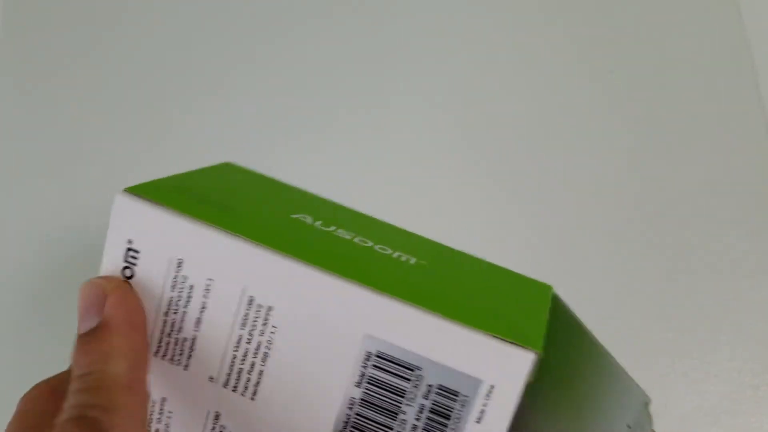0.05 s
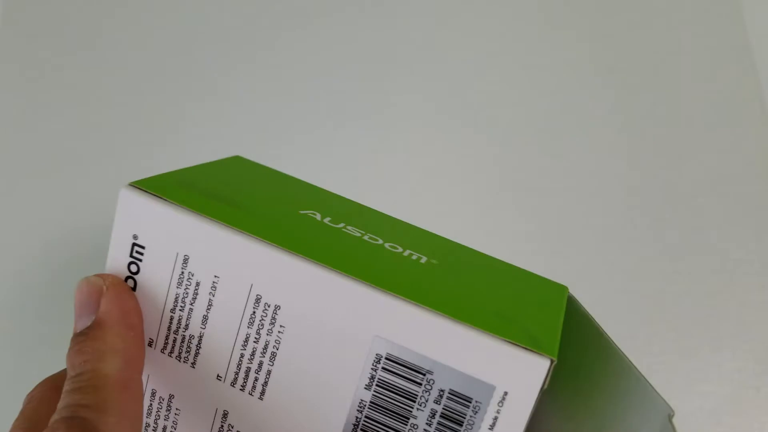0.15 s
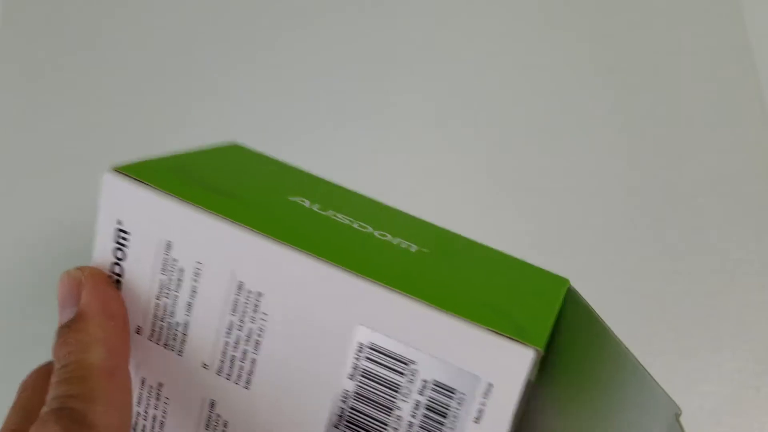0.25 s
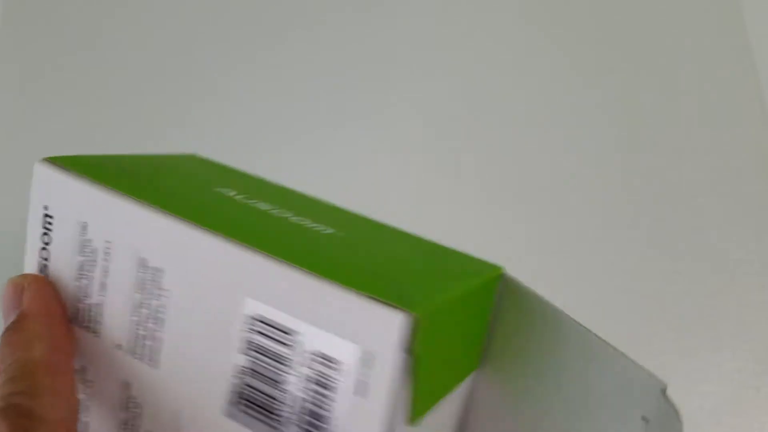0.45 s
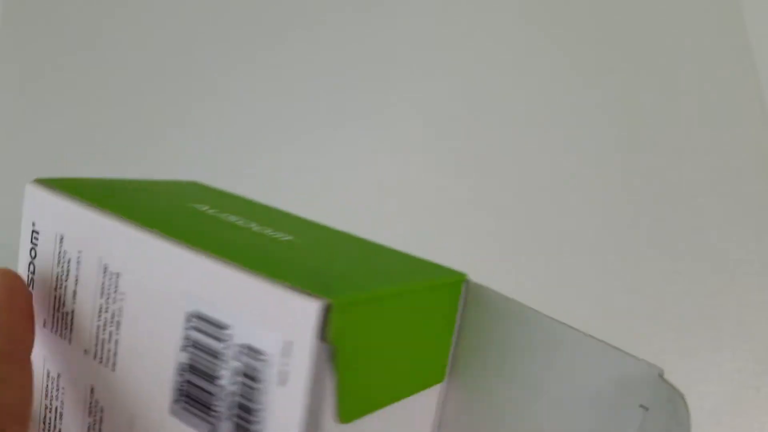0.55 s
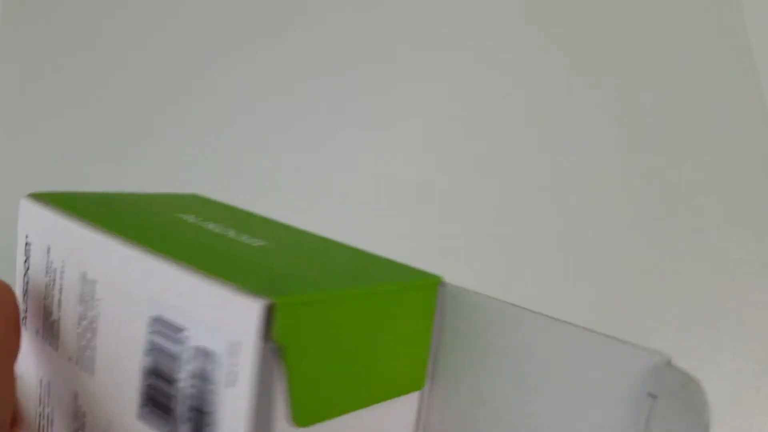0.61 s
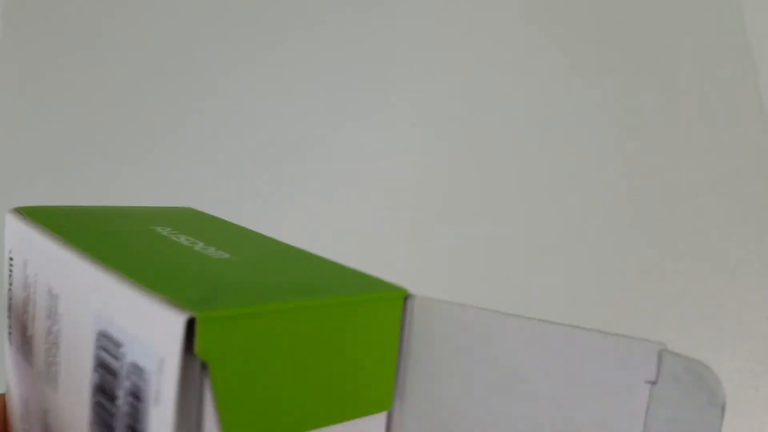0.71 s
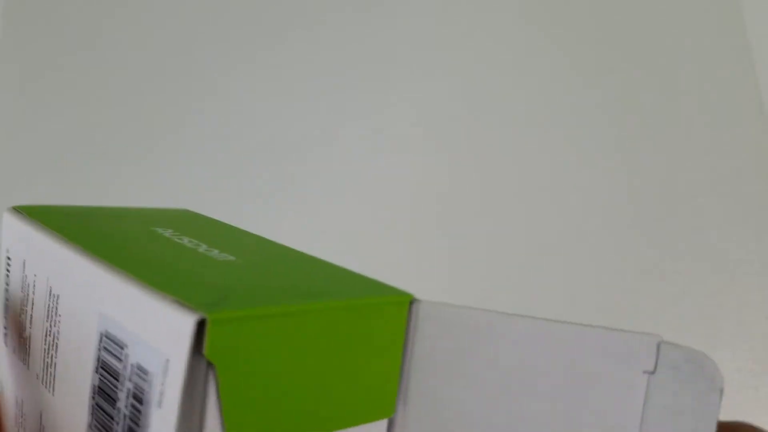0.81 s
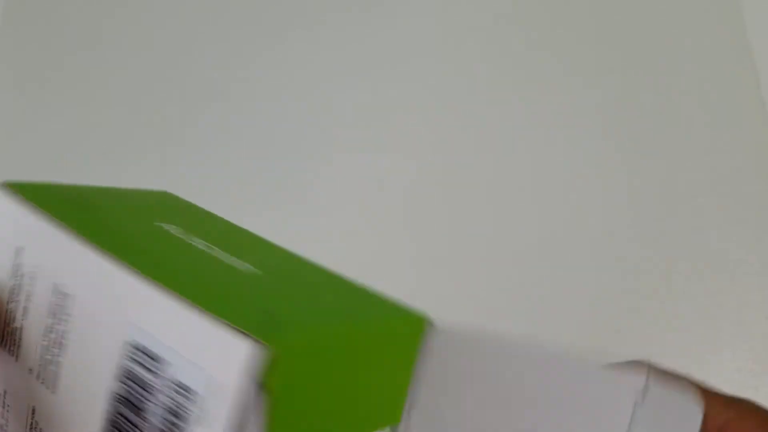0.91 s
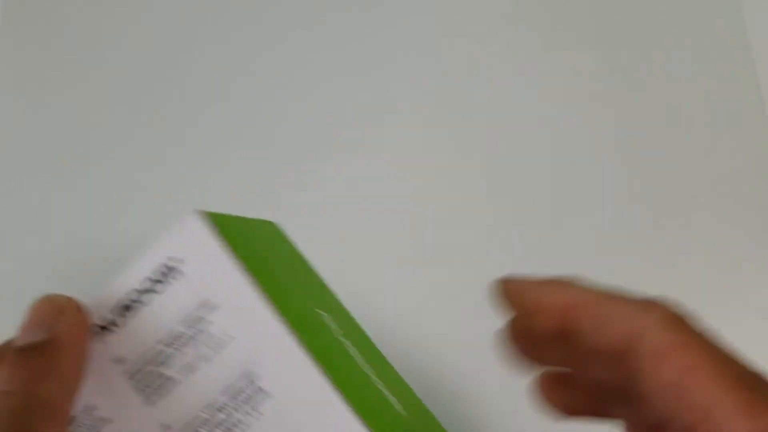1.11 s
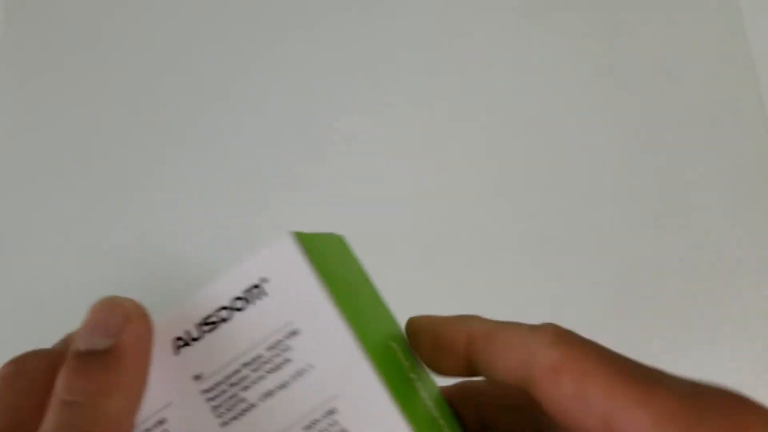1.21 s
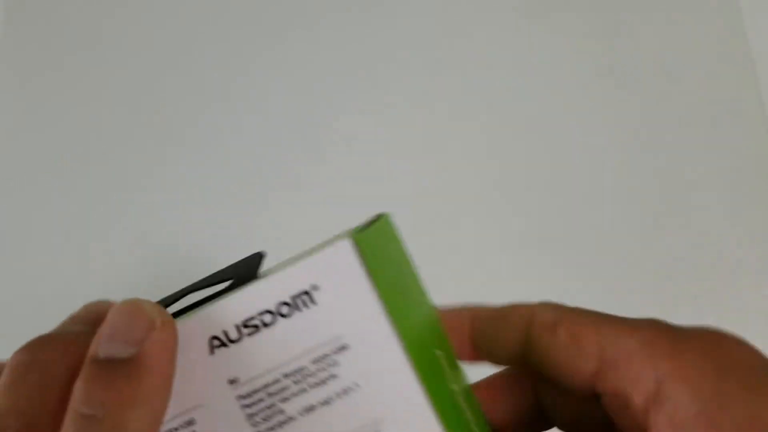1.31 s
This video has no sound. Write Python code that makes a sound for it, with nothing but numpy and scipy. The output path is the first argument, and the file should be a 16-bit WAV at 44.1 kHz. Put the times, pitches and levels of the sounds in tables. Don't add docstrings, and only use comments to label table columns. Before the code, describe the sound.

Fingers slide and tap on a small glossy carton, whose flap pops loose with a loud crack

```python
import sys
import numpy as np
from scipy import signal
from scipy.fft import rfft, irfft, next_fast_len
from scipy.io import wavfile

SR = 44100
rng = np.random.default_rng(int(sys.argv[2]) if len(sys.argv) > 2 else 0)


def convert_level_to_amplitude(level_db):
    exponent = np.asarray(level_db, float) / 20
    return 10 ** exponent


def store_wav(level_fs):
    pcm = np.round(np.clip(np.atleast_2d(level_fs), -1, 1) * 32767)
    wavfile.write(sys.argv[1], SR, pcm.T.astype(np.int16))


N = 59535

# start_s, skin_hiss_db, drag_over_hiss_db, board_rumble_db, left_right_db
STROKES = [(0, -52, 1.5, -53.5, -8.5), (0.038, -65.5, 7, -58, -8.5), (0.151, -85.5, 6, -81.5, -11.5),
           (0.164, -66.5, 5.5, -61, -7.5), (0.234, -61.5, 10.5, -44.5, -4.5),
           (0.481, -81.5, 0, -76.5, -19.5), (0.526, -62.5, -1.5, -65, -9.5),
           (0.637, -82, 0.5, -84.5, -15.5), (0.663, -71, 4, -76, -19.5), (0.782, -61, -4.5, -65, -6),
           (0.84, -83, -3.5, -86.5, -20), (0.887, -50, -1.5, -77, -12), (0.962, -53.5, -4, -90, -13),
           (1.02, -94, -5.5, -99, -8), (1.15, -92.5, -8, -91.5, -7.5), (1.202, -65, -18.5, -85, -21),
           (1.24, -64.5, -24.5, -93, -14.5), (1.299, -86, 15, -79.5, -12.5)]
# freq_hz, density_db
SKIN_SPECTRUM = [(300, -81), (2500, -46), (4300, -25.5), (5000, -6), (6000, -5.5), (10000, -2), (13500, 0),
                 (16000, -4.5)]
# freq_hz, density_db
DRAG_SPECTRUM = [(250, -77), (900, -39.5), (1900, -14.5), (2600, -4.5), (3200, -5.5), (4400, -6),
                 (6500, -8), (10000, -36)]
# pitch_hz, level_db, t60_s
PANEL_MODES = [(210, -4.5, 0.014), (330, -7.5, 0.022), (553.7, -12.5, 0.021), (660, -6, 0.022),
               (790, 3, 0.012), (1010, -2, 0.03), (1420, 8.5, 0.007), (1860, -5, 0.01), (2050, -0.5, 0.014),
               (2830, 3, 0.0049), (4300, -7, 0.0064), (6400, -36, .006)]
# freq_hz, density_db
AIR_SPECTRUM = [(25, -18.5), (55, -0.5), (110, -18.5), (220, -25.5), (500, -33.5), (1200, -46.5),
                (4000, -43.5), (15000, -43.5)]
# start_s, peak_db, contact_hardness_hz, left_right_db, panel_pitch_hz
KNOCKS = [(.0004, -33.5, 2500, 16, 1400), (.0085, -28, 966, -4, 411), (0.0125, -32.5, 933, -5.5, 586),
          (.0255, -26.5, 5000, 1, 3170), (.0290, -34.5, 1308, 14, 820), (.0298, -41.5, 5975, -3.5, 2950),
          (.035, -57, 1500, -12, 830), (.0425, -41.5, 1160, -14.5, 890), (.0465, -42.5, 1204, 3, 860),
          (.047, -51.5, 6000, -3.5, 3450), (.055, -64, 1200, -3, 820), (.0712, -39.5, 1500, -4.5, 750),
          (.073, -52.5, 4000, -3.5, 1900), (.086, -38.5, 5000, 7, 2900), (.157, -51, 914, 0.5, 680),
          (.176, -45, 892, -5, 600), (.435, -53, 1080, 7, 800), (0.47, -45.5, 1120, -0.5, 970),
          (.534, -51.5, 914, -6, 495), (.662, -44.5, 2470, -5.5, 582), (.832, -69.5, 1500, -11.5, 900),
          (0.855, -52.5, 9000, -15.5, 1710), (1.172, -60.5, 1196, -7, 850), (1.1925, -55, 1205, -2, 541),
          (1.302, -51.5, 1500, -3, 750), (1.3128, -37, 9000, -9, 1300), (1.3142, -40.5, 1510, -6, 680),
          (1.319, -51.5, 1510, -6, 620), (1.3277, -40, 2630, -3, 627), (1.3372, -47, 1090, -8, 584),
          (1.345, -57, 1980, -14, 1500)]
TICK_S = [.008, .028, .661, .855, 1.193, 1.2875, 1.3128, 1.328]
TICK_DB = [-49, -41.5, -54.5, -64, -65, -54.5, -54.5, -60]
# start_s, level_db
JOLTS = [
    (.0085, -40.5),
    (0.068, -48),
    (0.179, -55),
    (.246, -43.5),
    (0.661, -59.5),
    (1.322, -59),
]
# pitch_hz, level_db, t60_s
JOLT_MODES = [(45, -8.5, 0.056), (121, 2, 0.034), (215, 2.3, 0.047), (298, -3.5, 0.048)]
# start_s, peak_db
SNAP_JERKS = [
    (.2357, -38.5),
    (0.23675, -12.5),
    (0.2378, -10.5),
    (0.23875, -10.5),
]
# pitch_hz, level_db, t60_s
FLAP_MODES = [(1060, -1, 0.0075), (2100, -11, 0.0026), (2620, -2, 0.0084), (2984, -2, 0.006),
              (4000, -8, 0.0068), (5040, -6, 0.009), (6020, -1, 0.0034), (7120, -5.5, 0.0037)]
# freq_hz, level_db
CRACK_SPECTRUM = [(600, -42.5), (2000, -8), (4000, -10), (7000, -3.5), (12000, 4.5), (16000, -2.5)]
# delay_s, level_db, left_right_db
ECHOES = [(.004, -13, -7.5), (.0083, -13.5, -8), (.0155, -21, -3.5), (.0255, -21.5, 6.5), (.031, -18.5, -7)]
# pitch_hz, level_db, t60_s
SHELL_MODES = [(210.6, -36, 0.14), (353.9, -37.5, 0.23), (556.3, -30.5, 0.2), (872, -34.5, 0.31),
               (962, -36, 0.062), (1065, -32.5, .25), (1700, -36.5, 0.67), (2080, -34.5, 0.62),
               (2142, -23, 0.2), (2164, -27, .09), (2584, -28.5, .08), (2815, -31.5, .2)]
# start_s, length_s, pitch_hz, level_db
WHISTLES = [(0.59, 0.059, 1800, -72), (.87, 0.042, 1330, -52.5), (.87, 0.049, 1560, -55.5),
            (.895, 0.041, 661, -63), (0.79, 0.045, 850, -81), (.945, 0.0408, 842, -69),
            (.94, 0.057, 1800, -64), (0.886, .1, 2100, -65.5), (.87, 0.05, 2080, -61),
            (1.3, 0.053, 500, -74), (0.42, 0.063, 2200, -79), (1.19, 0.048, 1167, -76),
            (1.4, .04, 1640, -65), (1, .03, 814, -67)]
# freq_hz, level_db
SNAP_TO_WALLS = [(80, -23.5), (300, -8), (900, 0.5), (1400, -4), (2000, 3.5), (3500, -6), (7000, -8.5),
                 (16000, -19)]
# freq_hz, t60_s
ROOM_T60 = [(150, 0.21), (500, 0.22), (2000, 0.26), (6000, 0.24), (14000, 0.19)]
# freq_hz, likeness_0_to_1
ROOM_ALIKE = [(60, 0.54), (300, 0.63), (700, .3), (1500, .02)]

LEFT_LAG_S = 0.00026
SNAP_S = SNAP_JERKS[1][0]


def rms_one(x):
    return x / np.sqrt(np.mean(x ** 2) + 1e-20)


def at_hz(points, hz):
    points_hz, values = np.transpose(points)
    return np.interp(np.log(hz + 1), np.log(points_hz), values)


def colour(x, points):
    gain = convert_level_to_amplitude(at_hz(points, np.fft.rfftfreq(x.shape[-1], 1 / SR)))
    return irfft(rfft(x) * gain, x.shape[-1])


def butter(x, order, hz, kind="low"):
    return signal.sosfilt(signal.butter(order, hz, kind, fs=SR, output="sos"), x)


def ring(clicks, hz, t60):
    r = convert_level_to_amplitude(-60 / (t60 * SR))
    w = 2 * np.pi * hz / SR
    return signal.lfilter([0, np.sin(w)], [1, -2 * r * np.cos(w), r * r], clicks + 1e-18)


def ring_modes(clicks, modes):
    return sum(convert_level_to_amplitude(db) * ring(clicks, hz, t60) for hz, db, t60 in modes)


def grains(per_s, uneven_db):
    excess = np.minimum(rng.exponential(1, N), 5)
    sizes = convert_level_to_amplitude(uneven_db * excess) * rng.choice([-1, 1], N)
    return sizes * (rng.random(N) < per_s / SR)


def clicks_at(events, offset_db=0):
    clicks = np.zeros(N)
    for s, db in events:
        clicks[int(s * SR)] = convert_level_to_amplitude(db + offset_db)
    return clicks


def pan(left, right, pan_db):
    return np.array([left * convert_level_to_amplitude(pan_db / 2), right * convert_level_to_amplitude(-pan_db / 2)])


def place(x, pan_db):
    late = np.interp(np.arange(N) - LEFT_LAG_S * SR, np.arange(N), x, left=0)
    return pan(late, x, pan_db)


def slide():
    s, *columns = np.transpose(STROKES)
    skin_db, drag_db, board_db, pan_db = [np.interp(np.arange(N) / SR, s, c) for c in columns]
    wobble = butter(rng.standard_normal(N), 2, 70.0)
    judder = convert_level_to_amplitude(0.9 * rms_one(wobble))
    slips = grains(per_s=7100, uneven_db=3.0)
    hiss = rms_one(colour(slips, SKIN_SPECTRUM))
    drag = rms_one(colour(slips, DRAG_SPECTRUM))
    skin = hiss + convert_level_to_amplitude(drag_db - 0.5) * drag
    board = sum(convert_level_to_amplitude(db) * ring(grains(2000, 3), hz, t60) for hz, db, t60 in PANEL_MODES)
    board = rms_one(butter(board, 2, 170.0, "high"))
    skin = pan(np.roll(skin, int(round(LEFT_LAG_S * SR))), skin, pan_db)
    return judder * (convert_level_to_amplitude(skin_db) * skin + convert_level_to_amplitude(board_db) * place(board, 1.54 * pan_db))


def hum():
    hum_hz, hum_db, octave_db = 62.3, -63, -16
    throb_hz, throb_peak_s, throb_depth = 6.15, 0.772, 1.4
    left_lead_rad = 0.53
    t = np.arange(N) / SR
    throb = 1 + throb_depth * np.cos(2 * np.pi * throb_hz * (t - throb_peak_s))
    turn = 2 * np.pi * hum_hz * t + np.array([[left_lead_rad], [0]])
    tone = throb * np.sin(turn) + convert_level_to_amplitude(octave_db) * np.sin(2 * turn[1])
    return convert_level_to_amplitude(hum_db) * pan(*tone, -2.5)


def air():
    return convert_level_to_amplitude(-67.5) * rms_one(colour(rng.standard_normal((2, N)), AIR_SPECTRUM))


def knocks():
    panel_db, panel_cycles = 6, 9.0
    out = np.zeros((2, N))
    click = np.zeros(4000)
    click[0] = 1
    all_luck = rng.normal(0, 2.5, (len(KNOCKS), len(PANEL_MODES)))
    for (s, db, hard_hz, pan_db, panel_hz), luck in zip(KNOCKS, all_luck):
        push = butter(click, 2, min(hard_hz, 15000))
        body = ring_modes(push, [(hz, m_db + z, t60) for (hz, m_db, t60), z in zip(PANEL_MODES, luck)])
        body = body + convert_level_to_amplitude(panel_db) * ring(push, panel_hz, panel_cycles / panel_hz)
        body = -butter(body, 2, 380.0, "high")
        line = np.zeros(N + len(click))
        start = int(s * SR)
        line[start:start + len(click)] = body / np.abs(body).max() * convert_level_to_amplitude(db)
        out += place(line[:N], pan_db)
    return out


def ticks():
    length_s = 0.002
    t = np.arange(N) / SR
    shape = sum(convert_level_to_amplitude(db) * (t > s) * np.exp(-np.abs(t - s) / length_s) for s, db in zip(TICK_S, TICK_DB))
    scratch = rms_one(butter(rng.standard_normal(N), 2, 3000.0, "high"))
    return place(shape * scratch, -10)


def jolts():
    push = butter(-clicks_at(JOLTS, -5), 2, 500.0)
    return place(ring_modes(push, JOLT_MODES), -5.5)


def snap_click():
    return 1. * (np.arange(N) == int(SNAP_S * SR))


def snap():
    clicks = clicks_at(SNAP_JERKS)
    edge = convert_level_to_amplitude(-0.5) * ring_modes(clicks, FLAP_MODES)
    flap = edge + convert_level_to_amplitude(9.5) * colour(clicks, CRACK_SPECTRUM)
    flap = butter(flap, 2, 550, "high")
    left, right = place(flap, -5)
    echoes = sum(convert_level_to_amplitude(db) * place(np.roll(flap, int(s * SR)), pan_db) for s, db, pan_db in ECHOES)
    r = np.exp(-2 * np.pi * 2530 / SR)
    left = signal.lfilter([1 - r], [1, -r], left)
    echoes = signal.lfilter([1 - r], [1, -r], echoes)
    since_s = np.maximum(np.arange(N) / SR - SNAP_S, 0)
    shell_rise = 1 - np.exp(-since_s / 0.006)
    shell = place(ring_modes(snap_click(), SHELL_MODES) * shell_rise, -1.5)
    return np.array([left, right]) + echoes + shell


def hollow():
    edge_s, t60_s = 0.012, 0.06
    t = np.arange(N) / SR
    tone = 0
    for s, length, hz, db in WHISTLES:
        shape = np.clip(np.minimum(t - s, s + length - t) / edge_s, 0, 1)
        blown = shape * ring(grains(5000, 1.9), hz, t60_s)
        tone = tone + convert_level_to_amplitude(db) * rms_one(blown) * np.sqrt(np.mean(shape ** 2))
    return place(butter(tone, 4, 520.0, "high"), -7.5)


def room(x):
    room_db, pan_db, gap_s = -4, -1.5, 0.003
    t = np.arange(SR // 2) / SR
    white = rng.standard_normal((2, len(t)))
    edges = 60 * 2 ** np.arange(0, 8.6, .5)
    tail = 0
    for low, high in zip(edges, np.minimum(edges[1:], 19000)):
        left, right = butter(white, 2, [low, high], "band")
        alike = np.clip(at_hz(ROOM_ALIKE, low), 0, 1)
        band = np.array([alike * right + np.sqrt(1 - alike ** 2) * left, right])
        tail = tail + band * convert_level_to_amplitude(-60 * t / at_hz(ROOM_T60, np.sqrt(low * high)))
    tail = tail * np.clip(t / gap_s - 1, 0, 1)
    tail = tail / np.sqrt(np.sum(tail ** 2, axis=1, keepdims=True))
    tail = pan(*tail, pan_db)
    return convert_level_to_amplitude(room_db) * signal.fftconvolve(x[None], tail, axes=1)[:, :N]


def scene():
    rubs = slide() + ticks() + hollow()
    taps = knocks() + jolts()
    snap_all_round = convert_level_to_amplitude(21.5) * colour(snap_click(), SNAP_TO_WALLS)
    walls = room(convert_level_to_amplitude(-6) * rubs[1] + taps[1] + snap_all_round)
    return rubs + taps + snap() + walls + hum() + air()


def top_cut(x):
    return signal.sosfilt(signal.butter(12, 16640, fs=SR, output="sos"), x)


def record(dry):
    dip_hz, dip_width_hz, dip_db = 9000, 880, -4.5
    cutoff_hz, ceiling = 16600, 0.95
    size = next_fast_len(N + 2000)
    hz = np.fft.rfftfreq(size, 1 / SR)
    dip = convert_level_to_amplitude(dip_db * np.exp(-((hz - dip_hz) / dip_width_hz) ** 2))
    x = irfft(rfft(dry, size) * dip, size)[:, :N]
    x = signal.sosfilt(signal.cheby2(16, 50, cutoff_hz, fs=SR, output="sos"), x)
    x = ceiling * np.tanh(x / ceiling)
    return top_cut(x)


dry = scene()
out = record(dry)
store_wav(out)
```